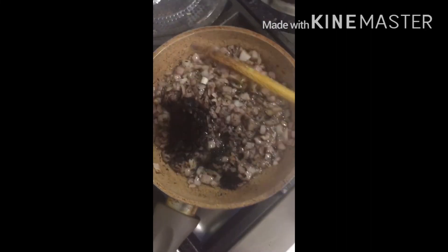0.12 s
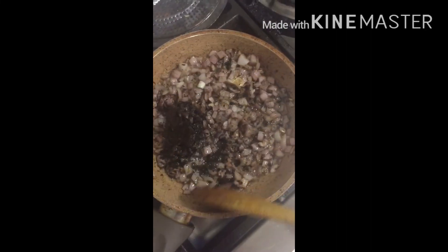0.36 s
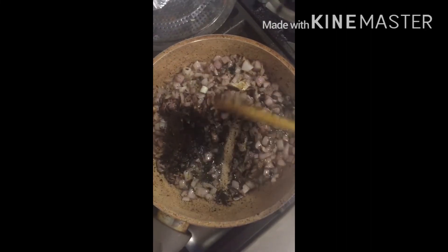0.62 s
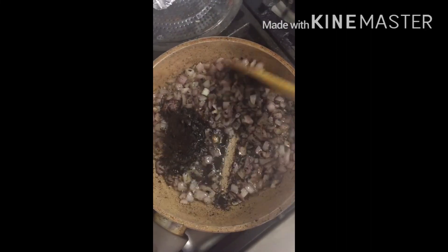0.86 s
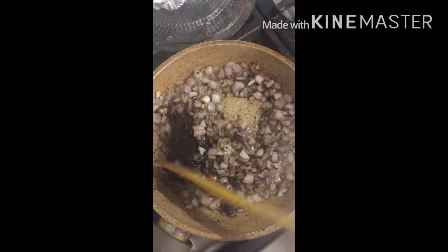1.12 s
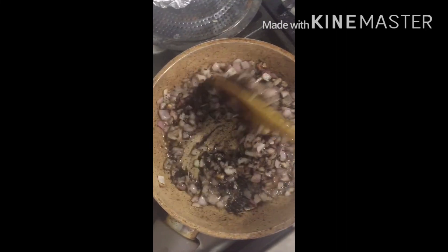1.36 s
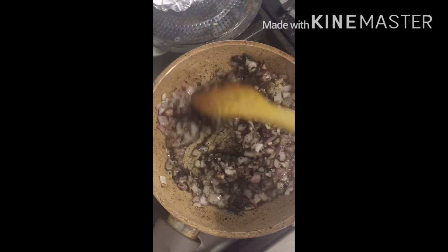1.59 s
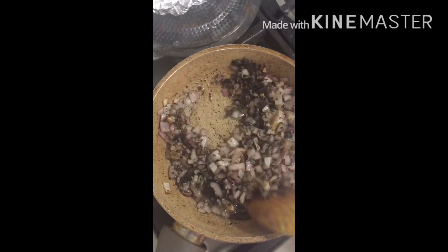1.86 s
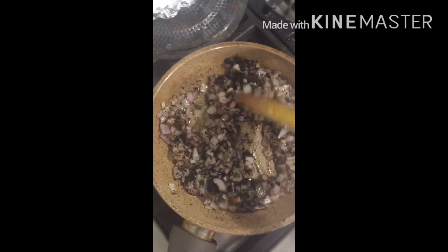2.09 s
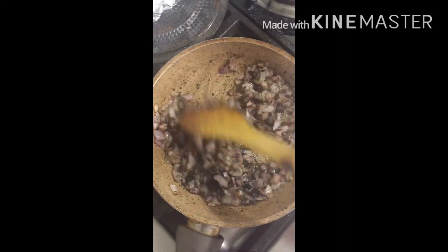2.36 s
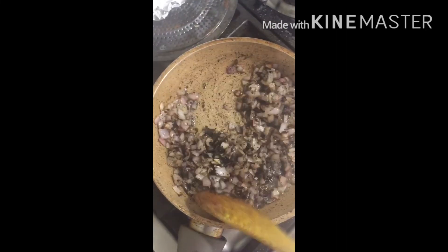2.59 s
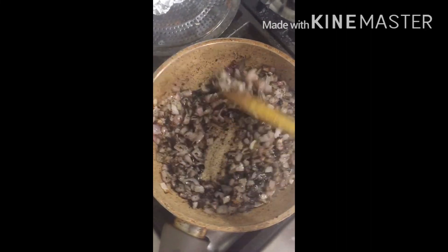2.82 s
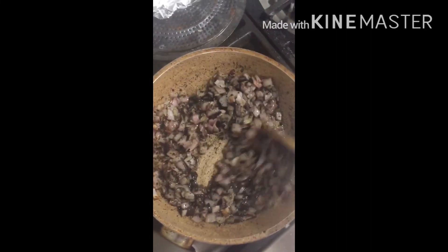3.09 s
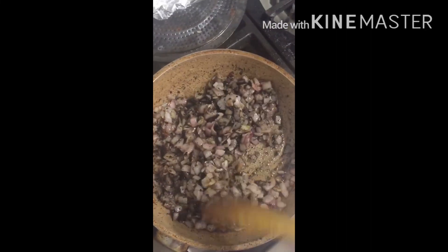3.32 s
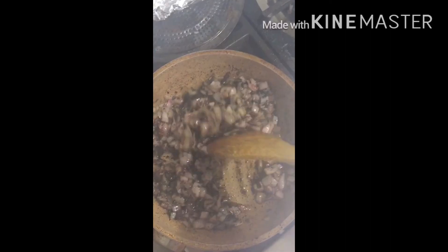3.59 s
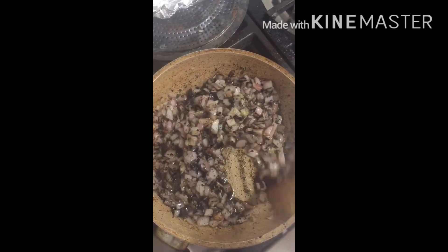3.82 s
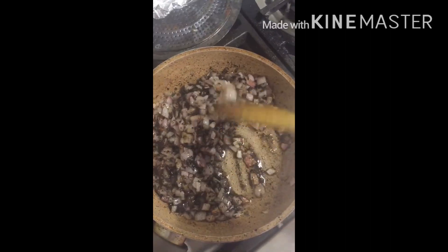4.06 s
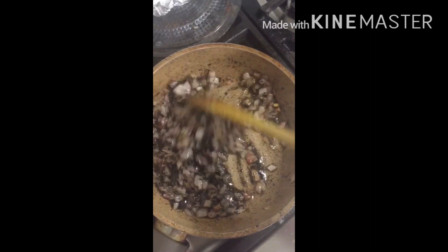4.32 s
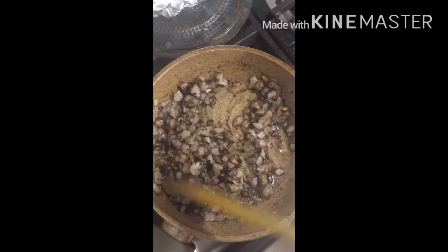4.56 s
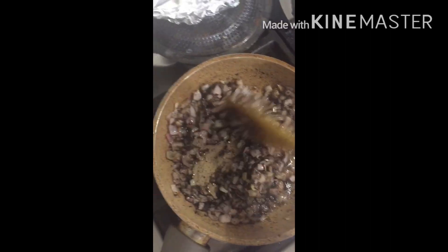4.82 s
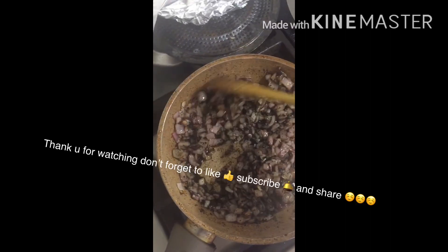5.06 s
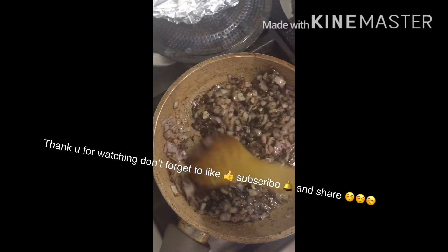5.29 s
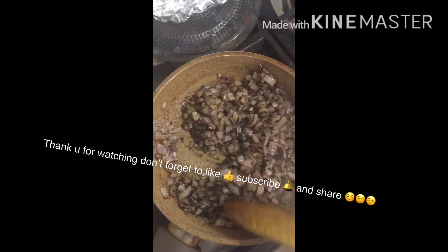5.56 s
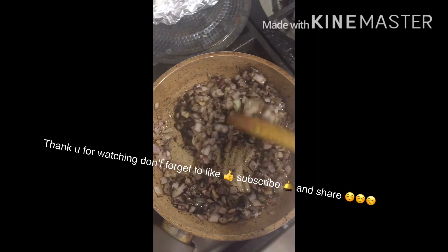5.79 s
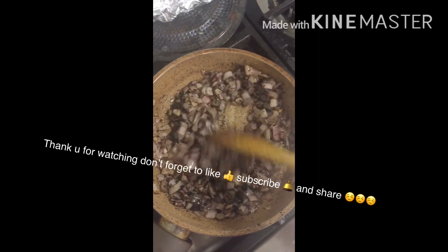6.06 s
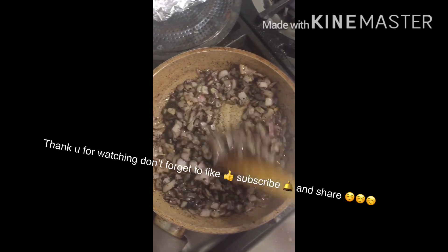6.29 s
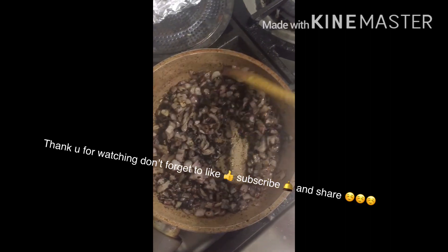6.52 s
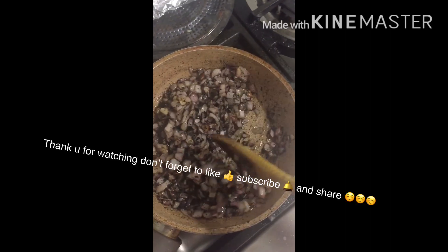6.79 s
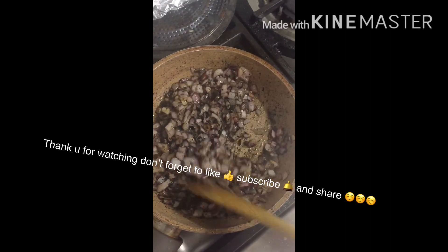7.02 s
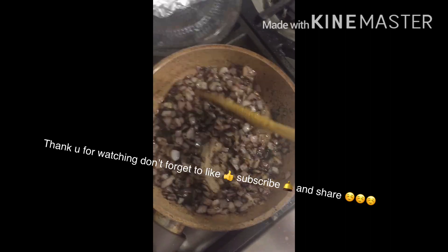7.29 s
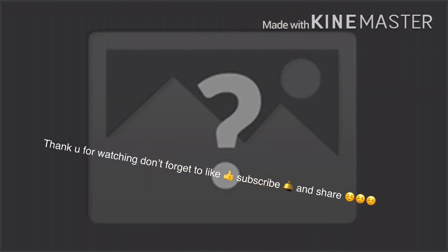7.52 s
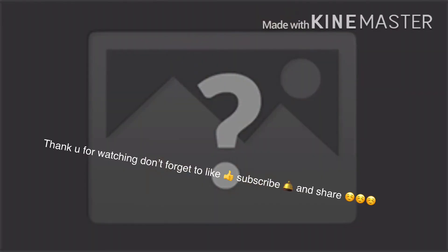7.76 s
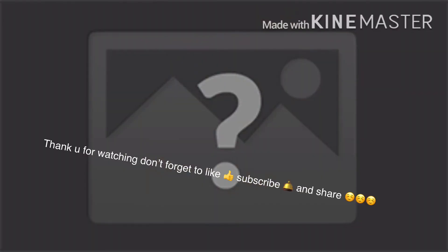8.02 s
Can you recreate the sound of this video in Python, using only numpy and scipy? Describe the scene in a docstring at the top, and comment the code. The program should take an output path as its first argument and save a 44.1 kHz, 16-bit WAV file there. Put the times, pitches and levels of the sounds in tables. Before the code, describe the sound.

In a small, fairly dry kitchen, a pan of frying onions crackles at close range, the same in both channels. Fine, fizzy bubbling is peppered with piercing snaps of oil. Wooden stirring brings hollow clunks, short rattles and gritty scrapes, some firm and some barely audible, over low rumble and wavering hum. The last strong knock and longer scrape lead to a very quick fade, then nothing.

```python
"""Onions frying in hot oil

Close to a single microphone: filtered random clicks and rings make the sizzle of bursting bubbles; shaped
noise bursts make loud single pops. A wooden spoon knocks and scrapes the pan, modelled as ringing modes plus
noise, over a wavering sine hum, noise rumble and dull bumps. The sound fades and is cut to silence."""
import sys
import numpy as np
from scipy import signal
from scipy.io import wavfile
from scipy.ndimage import uniform_filter1d

SR = 44100
rng = np.random.default_rng(int(sys.argv[2]) if len(sys.argv) > 2 else 0)


def master(y):
    """Save y as 16-bit WAV."""
    cut = np.clip(np.atleast_2d(y).T, -1, 1)
    pcm = np.round(cut * 32767)  # scale
    wavfile.write(sys.argv[1], SR, pcm.astype(np.int16))


def invert_db(level):
    """Linear amplitude ratio for a level in decibels (20 dB per decade), elementwise."""
    return 10 ** (np.asarray(level, dtype=float) / 20)


N = 358974
CUT_S = 7.483


def rms_one(x):
    """Scale to unit power."""
    return x / np.sqrt(np.mean(x ** 2) + 1e-20)


def in_time(rows):
    """Columns of a curve, interpolated at every sample."""
    time_s, *columns = np.transpose(rows)
    return [np.interp(np.arange(N) / SR, time_s, column) for column in columns]


def band(x, low_hz, high_hz):
    """Second-order Butterworth band-pass."""
    return signal.sosfilt(signal.butter(2, [low_hz, high_hz], "band", fs=SR, output="sos"), x)


def drift(rate_hz):
    """Slow random curve of rms 1: noise through a double pole at rate_hz, run at SR / 40."""
    r = np.exp(-2 * np.pi * rate_hz * 40 / SR)
    noise = rng.standard_normal(N // 40 + 2002)
    slow = signal.lfilter([1], [1, -2 * r, r * r], noise)[2000:]   # settled part
    return np.interp(np.arange(N) / 40, np.arange(len(slow)), rms_one(slow))


def ring(clicks, hz, t60_s):
    """Two-pole resonator: a unit click starts a decaying sine of height 1."""
    r, w = invert_db(-60 / (t60_s * SR)), 2 * np.pi * hz / SR
    return signal.lfilter([0, np.sin(w)], [1, -2 * r * np.cos(w), r * r], clicks + 1e-18)


def crackle(per_s, spread_db):
    """Random clicks of either sign, many small and few large, scaled to unit power."""
    sizes = invert_db(spread_db * np.minimum(rng.exponential(1, N), 6)) * rng.choice([-1, 1], N)
    return rms_one(sizes * (rng.random(N) < per_s / SR))


def banded(make, spectrum, patchy_db, extra_db):
    """Half-octave bands, each with its own source, level and flicker."""
    hz, level_db_per_hz = np.transpose(spectrum)
    band_count = int(2 * np.log2(hz[-1] / hz[0])) + 1
    edges_hz = np.geomspace(hz[0], hz[-1], band_count + 1)
    out = 0
    for low, high in zip(edges_hz, edges_hz[1:]):
        mid = np.sqrt(low * high)
        level_db = np.interp(np.log(mid), np.log(hz), level_db_per_hz)
        level_db = level_db + extra_db(mid) + patchy_db * drift(4.2)
        out = out + invert_db(level_db) * band(make(mid), low, high)
    return out


# vigour of the frying: time_s, hiss_rms_db
VIGOUR = [(0.0, -38.5), (0.28, -35), (0.72, -34), (0.99, -33.5), (1.29, -31), (2.12, -31), (2.3, -29),
          (2.93, -31), (3.29, -29.5), (3.55, -32.5), (4.04, -30.5), (4.22, -33), (4.81, -32), (5.01, -30.5),
          (5.43, -32), (6.04, -31), (6.28, -32.5), (6.46, -30.5), (6.68, -31), (7.25, -31.5)]
# relative sizzle spectrum: freq_hz, level_db_per_hz
SIZZLE_SPECTRUM = [(500, -12.5), (800, -8.5), (1200, 2), (2000, -6.5), (3000, -2), (4500, -5), (6500, -1),
                   (9000, -4.5), (12000, 1.5), (16000, -5)]


def sizzle():
    """Bubbles burst by the thousand, small ones oftener and higher; they come in flurries."""
    level_db = in_time(VIGOUR)[0]
    flurry = invert_db(1.9 * drift(25))
    wide = crackle(250 * flurry, spread_db=7.0)   # sharp snaps that reach every band

    def bursts(hz):
        own = crackle(2.5 * hz * flurry, spread_db=3.0)
        sparse = crackle(45 * flurry, spread_db=1.5)
        return own + 0.45 * wide + 0.31 * sparse

    def steadier(hz):
        # big low bubbles follow the heat only half-way
        return -0.55 * (hz < 3000) * (level_db - level_db.mean())

    hiss = rms_one(banded(bursts, SIZZLE_SPECTRUM, patchy_db=1.0, extra_db=steadier))
    # now and then a larger bubble rings for a few dozen cycles at its own pitch
    rings = 0
    for hz in np.geomspace(1100, 14500, 24):
        rings = rings + rms_one(ring(crackle(9.0 * flurry, spread_db=1.0), hz, 26.0 / hz))
    return invert_db(level_db) * (hiss + invert_db(-15.5) * rms_one(rings))


# resonances of pan air and wall echoes: centre_hz, width_hz, gain_db
AIR_PEAKS = [(1002, 42, 10), (1440, 110, 4), (3060, 280, -3), (4900, 380, -5.5), (7570, 350, -5.5),
             (10480, 330, -9)]


def pan_air(x):
    """Air in the pan and echoes off its wall colour what fries: a chain of peaks and dips."""
    for hz, width_hz, gain_db in AIR_PEAKS:
        w, a = 2 * np.pi * hz / SR, invert_db(gain_db / 2)
        q = np.pi * width_hz / SR
        top = [1 + q * a, -2 * np.cos(w), 1 - q * a]
        bottom = [1 + q / a, -2 * np.cos(w), 1 - q / a]
        x = signal.lfilter(top, bottom, x)
    return x


# hum partials: centre_hz, pitch_wander_rms_hz, level_db (before its wavering)
HUM_PARTIALS = [(102.3, 9.7, -54.5), (180.3, 4.95, -47)]


def hum():
    """Sines that waver in pitch and level."""
    out = 0
    for hz, wander_hz, level_db in HUM_PARTIALS:
        phase = 2 * np.pi * np.cumsum(hz + wander_hz * drift(8)) / SR
        out = out + invert_db(level_db + 2.2 * drift(3.6)) * rms_one(np.sin(phase))
    return out


# relative floor spectrum: freq_hz, level_db_per_hz
FLOOR_SPECTRUM = [(130, -16.5), (200, -8), (300, -10), (450, -33.5)]


def room_tone(rms_db=-55.5):
    """Dull noise floor with flickering bands."""
    noise = banded(lambda hz: rng.standard_normal(N), FLOOR_SPECTRUM, patchy_db=6.5, extra_db=lambda hz: 0)
    return invert_db(rms_db) * rms_one(noise)


# spoon strokes along the bottom: start_s, end_s, scrape_db, rasp_db (both before the stroke envelope)
STROKES = [(0.477, 0.68, -37.5, -49.5), (1.647, 1.72, -47.5, -49), (2.354, 2.468, -49.5, -37),
           (2.77, 2.876, -47, -60), (3.164, 3.275, -45.5, -46.5), (3.52, 3.733, -38, -59.5),
           (3.907, 4.095, -38.5, -47), (4.394, 4.495, -42, -60), (4.776, 4.9, -47, -58),
           (5.12, 5.217, -46, -61), (5.714, 5.847, -46, -43.5), (6.08, 6.18, -48.5, -51),
           (6.34, 6.53, -34.5, -55), (6.707, 6.836, -38.5, -51), (7.07, 7.368, -35.5, -33.5)]


def strokes(rest_db, column, bite):
    """Stroke reaches bite in 19 ms, 0.7 by three tenths, fades until 78 ms past end_s; never quite still.

    A low bite gives a slower swell."""
    t, out = np.arange(N) / SR, invert_db(rest_db)
    for row in STROKES:
        start, end = row[:2]
        corners_s = [start, start + 0.019, start + 0.3 * (end - start), end + 0.078]
        out = out + invert_db(row[column]) * np.interp(t, corners_s, [0, bite, 0.7, 0])
    return out


# dull bumps through the stove: centre_s, peak_db, pitch_hz, length_s (full width at 1/e)
STOVE_BUMPS = [(0.42, -35.5, 60, 0.037), (0.535, -40, 85, 0.044), (1.393, -29, 70, 0.039),
               (1.453, -33.5, 80.5, 0.063), (1.797, -30, 60, 0.035), (3.617, -29, 78, 0.027),
               (3.71, -35, 65, 0.034), (4.105, -40, 65.7, .05), (4.3, -38, 55, .05), (4.84, -37, 105, 0.28),
               (5.015, -41, 75, 0.061), (5.937, -37, 55, .04), (6.317, -32, 59.7, .06),
               (6.44, -39, 60, 0.035), (6.48, -37, 60, 0.03), (7.095, -26, 80, 0.022),
               (7.22, -33.5, 90, 0.27), (7.354, -31, 66.1, .04)]


def rumble():
    """Lumpy low noise through the stove rises with each stroke; single dull bumps are added.

    Most bumps last a few cycles, two of them are a longer low swell."""
    t = np.arange(N) / SR
    stroke_level = strokes(rest_db=-57.5, column=2, bite=0.95)
    level = invert_db(2.5 * drift(4.9)) * (invert_db(-48.5) + invert_db(-5.5) * stroke_level)
    out = level * rms_one(band(rng.standard_normal(N), 55, 147.5))
    phases = rng.uniform(0, 2 * np.pi, len(STOVE_BUMPS))
    for (centre_s, peak_db, hz, length_s), phase in zip(STOVE_BUMPS, phases):
        swell = np.exp(-(2 * (t - centre_s) / length_s) ** 2)
        out = out + invert_db(peak_db) * swell * np.sin(2 * np.pi * hz * t + phase)
    return out


# modes of pan and grate: freq_hz, level_db (relative), t60_s (undamped)
PAN_MODES = [(91.5, -18.5, 0.29), (125, -15, 0.56), (197.8, -4.5, 0.35), (225, -9.5, 0.4),
             (260.4, -8.5, 0.27), (312.4, -4.5, .3), (354, -10.5, 0.27), (418, -4.5, 0.25),
             (439, -8.5, 0.16), (513.5, -13, 0.33), (550, -4, 0.098), (670, -5.5, 0.079),
             (820, -15.5, 0.53), (890, -10.5, 0.088), (1008, 2, 0.082), (1168, -2.5, 0.22),
             (1290, -8, 0.083), (1400, -10.5, 0.089), (1734, -6.5, 0.061), (2058, -9.5, 0.067),
             (2800, -15, 0.18)]


def scraping():
    """Dense slips: low modes damped by the resting spoon, and a broad rasp of wood and onions on metal."""
    slips = crackle(1500, spread_db=2.0)
    body = 0
    for k, (hz, level_db, t60_s) in enumerate(PAN_MODES):
        if 150 < hz < 700:
            body = body + (-1) ** k * invert_db(level_db) * ring(slips, hz, 0.22 * t60_s)
    rasp = band(crackle(1500, spread_db=0.0), 490, 2700)
    scrape_level = strokes(rest_db=-53, column=2, bite=1.0)
    rasp_level = strokes(rest_db=-46, column=3, bite=0.35)
    return scrape_level * rms_one(body) + rasp_level * rms_one(rasp)


def small_pops(count=110, low_hz=4500, high_hz=15320):
    """Lesser pops at random times, peaks set above the sizzle; rows as in LOUD_POPS."""
    when, size, pitch = rng.random((count, 3)).T
    start_s = when * CUT_S
    peak_db = np.interp(start_s, *np.transpose(VIGOUR)) + 11 - 2.5 * np.log10(size + 0.01)
    pitch_hz = low_hz * (high_hz / low_hz) ** pitch
    return np.transpose([start_s, peak_db, pitch_hz, np.full(count, 10)])


# loud pops of oil: start_s, peak_db (before walls and pan air), pitch_hz, fall_db_per_octave
LOUD_POPS = [(0.1746, -13.5, 1970, 11), (0.2317, -10, 6600, 7.5), (1.2166, -10, 13000, 23),
             (1.2996, -16, 13500, 17), (1.315, -5.5, 13600, 14), (1.3338, -17, 8000, 5),
             (1.6855, -15, 3020, 7), (1.7304, -2, 6900, 9), (1.7646, -7, 13400, 14),
             (2.1382, -9, 7000, 6.5), (2.1988, -11, 5530, 22), (2.3114, -11, 9500, 14),
             (2.5117, -5, 12100, 11), (2.5278, -9, 10000, 14), (2.5601, -3, 4500, 10),
             (2.638, -12, 14000, 10), (2.7423, -12, 12000, 21), (2.8136, -14.5, 10000, 5),
             (2.8472, -11, 14500, 9), (3.026, -11, 1760, 14.5), (3.1056, -12, 10000, 23),
             (3.1933, 0.5, 7900, 18), (3.2951, -15, 8550, 17), (3.3268, -8, 5300, 18),
             (3.8325, -13, 14000, 7.5), (3.9231, -14, 13000, 15), (3.9303, -12, 13500, 8),
             (3.979, -13.5, 7800, 26), (4.0466, -11, 9700, 30), (4.3953, -14.5, 11500, 14),
             (4.436, -17, 13500, 14.5), (4.508, -0.5, 6700, 8.5), (4.5135, -15, 6000, 18),
             (4.656, -13.5, 6200, 13), (4.6614, -13, 7640, 7), (4.6711, -13, 10000, 9),
             (5.0206, -2.5, 8600, 13.5), (5.0265, -12, 8000, 6), (5.3272, -13, 10100, 16.5),
             (5.5608, -12, 9100, 27), (5.6235, -9.5, 8600, 7), (5.8347, -8.5, 13000, 18.5),
             (5.846, -8.5, 12000, 19.5), (5.4072, -17, 2800, 10), (5.8904, -18, 2000, 14),
             (6.0084, -21, 2500, 9), (5.958, -10.5, 12430, 22), (6.0735, -14, 14200, 19.5),
             (6.1297, 1, 9800, 23), (6.1656, -14, 14000, 11), (6.2428, -14, 10000, 6),
             (6.466, -17, 8060, 10), (6.509, -14, 8500, 12), (6.53, -12, 10000, 12),
             (6.8842, -16, 7500, 23), (7.4204, -14, 1160, 20)]


def pops():
    """A millisecond crack, then a spray of droplets dying away; each is loudest at its bubble's pitch."""
    t = np.arange(1500) / SR
    start_s, peak_db, pitch_hz, fall_db = np.vstack([small_pops(), LOUD_POPS]).T
    shape = np.exp(-t / 0.00053) + invert_db(-20) * np.exp(-t / 0.0091)
    noise = rng.standard_normal((len(start_s), len(t))) * shape
    noise[:, 0] = 2.8   # the skin of the bubble tears at once
    edges_hz, bursts = np.geomspace(500, 16500, 13), 0
    for k, (low, high) in enumerate(zip(edges_hz, edges_hz[1:])):
        part = band(noise, low, high)
        octaves = np.abs(np.log2(np.sqrt(low * high) / pitch_hz))
        gain = invert_db(-fall_db * octaves) / np.abs(part).max(axis=1)
        bursts = bursts + (-1) ** k * part * gain[:, None]
    out = np.zeros(N)
    for start, db, burst in zip(start_s, peak_db, bursts):
        out[round(start * SR):][:len(t)] += invert_db(db) * burst / np.abs(burst).max()
    return out


def walls(x, t60_s=0.26, wet_db=-20):
    """Short dense room tail: decaying noise after 3 ms."""
    t = np.arange(int(0.3 * SR)) / SR
    tail = rng.standard_normal(len(t)) * invert_db(-60 * t / t60_s) * (t > 0.003)
    return x + invert_db(wet_db) * signal.fftconvolve(x, tail / np.linalg.norm(tail))[:N]


# spoon on the pan: start_s, ring_peak_db, low_modes_db, high_modes_db, contact_s (decay of the force)
SPOON_KNOCKS = [(.475, -12, 4, 1, 0.006), (1.67, -29, 10, -4, 0.0086), (2.383, -34, -6.5, -6, 0.023),
                (2.796, -33, -0.5, -20, 0.041), (3.084, -24, 8.5, -14.5, 0.005),
                (3.155, -19, -16, -1.5, 0.036), (3.516, -13, -7.5, -5, 0.008),
                (3.878, -12, -15, -3.5, 0.012), (3.958, -21.5, 4, -14, 0.014),
                (4.387, -27, 0, -27.5, 0.0085), (4.76, -27, 27, -26, 0.025), (5.135, -33, 5, -16, 0.026),
                (5.727, -22.5, 21, -17, 0.0065), (5.786, -25.5, 14, -19, 0.01),
                (6.088, -27, 14, -10.5, 0.035), (6.358, -16, -7.5, -20, 0.012),
                (6.681, -23.5, 15, -6, 0.021), (7.079, -9.5, -6, -7, 0.0082)]


def knocks():
    """A blow and short rattle ring the pan: a dead thud on each mode, a snap of wood, a shuddering grate."""
    t = np.arange(SR // 2) / SR
    size = (len(SPOON_KNOCKS), len(t))
    rattle = rng.standard_normal(size) * (rng.random(size) < 0.03)
    rattle[:, 0] = 3.2   # the blow itself
    shudder = band(rng.standard_normal(size), 120, 600) * np.exp(-t / 0.093)
    uneven_db = rng.normal(0, 2.0, (len(SPOON_KNOCKS), len(PAN_MODES)))
    out = np.zeros(N)
    for row, hits, shake, odd_db in zip(SPOON_KNOCKS, rattle, shudder, uneven_db):
        start_s, peak_db, low_db, high_db, contact_s = row
        force, modes = hits * np.exp(-t / contact_s), 0
        for k, (hz, level_db, t60_s) in enumerate(PAN_MODES):
            octaves = np.log2(hz / 420)
            tone_db = np.interp(octaves, [-1.7, -1, -0.3, 0.1, 0.7], [-6, low_db, low_db / 2, 0, high_db])
            thud = invert_db(9) * ring(force, hz, 0.25 * t60_s)
            gain = (-1) ** k * invert_db(level_db + tone_db + odd_db[k])
            modes = modes + gain * (ring(force, hz, t60_s) + thud)
        snap = band(force * np.exp(-t / 0.0076), 1400, 3500)
        knock = modes / np.abs(modes).max()
        knock = knock + invert_db(-2 + 0.98 * high_db) * snap / np.abs(snap).max()   # snap grows with the high modes
        knock = knock + invert_db(-11) * shake / np.abs(shake).max()
        out[round(start_s * SR):][:len(t)] += invert_db(peak_db) * knock
    return out


def scene():
    """One microphone feeds both channels."""
    frying = pan_air(sizzle() + walls(pops()))
    spoon = knocks() + scraping()
    kitchen = hum() + rumble() + room_tone()
    mono = frying + spoon + kitchen
    return np.array([mono, mono])


def gain_control(x):
    """Ducks 0.6 dB per dB of short-term level above -22 dB; the held excess falls 40 dB a second."""
    level_db = 10 * np.log10(uniform_filter1d(x[0] ** 2, size=1300) + 1e-12)
    over_db = np.maximum(level_db + 22, 0)
    fall_db = 40 * np.arange(N) / SR
    held_db = np.maximum.accumulate(over_db + fall_db) - fall_db
    r = np.exp(-1 / (0.0016 * SR))   # 1.6 ms smoothing
    return x * invert_db(-0.6 * signal.lfilter([1 - r], [1, -r], held_db))


# closing fade: time_s, gain_db
FADE_OUT = [(7.33, -0.5), (7.38, -1), (7.42, -7.5), (7.455, -13.5), (7.482, -22)]


def fade_and_cut(x):
    """Fade along the gain curve, then silence from CUT_S."""
    return x * invert_db(in_time(FADE_OUT)[0]) * (np.arange(N) < CUT_S * SR)


def low_pass(x):
    """Removes everything above the highest recorded frequency."""
    return signal.sosfilt(signal.butter(12, 16970, fs=SR, output="sos"), x)


def record(dry):
    """Gain control, steep top cut, overload, low cut, then fade and cut."""
    x = gain_control(dry)
    x = signal.sosfilt(signal.cheby2(16, 60, 16250, fs=SR, output="sos"), x)
    x = np.clip(x, -0.95, 0.95)   # loudest pops overload
    x = signal.sosfilt(signal.butter(4, 30, "high", fs=SR, output="sos"), x)   # small capsule
    mix = fade_and_cut(x)
    return low_pass(mix)


dry = scene()
out = record(dry)
master(out)
```